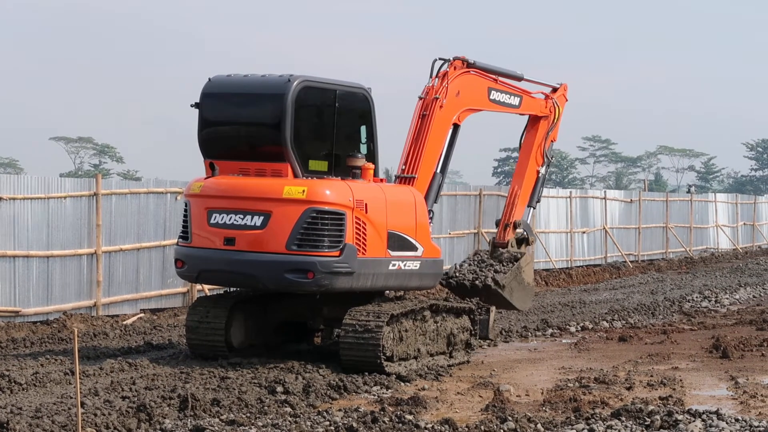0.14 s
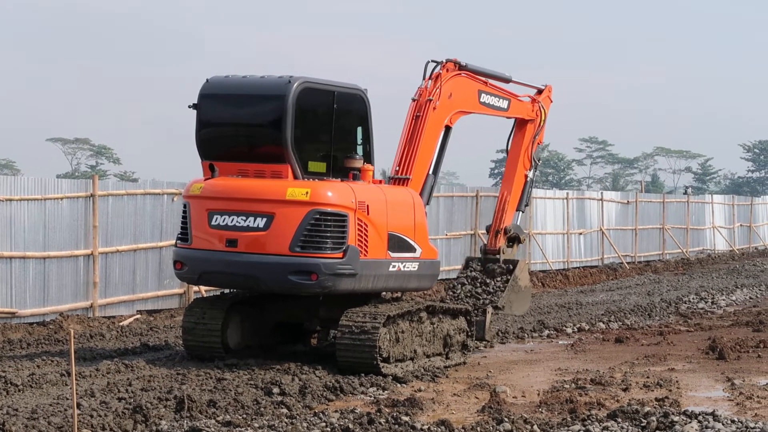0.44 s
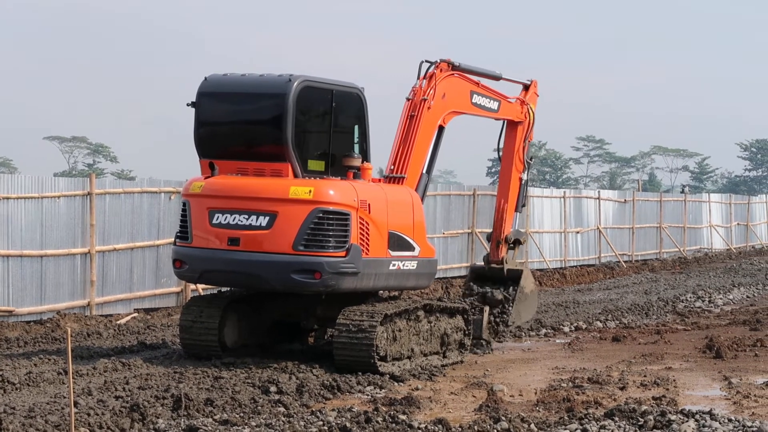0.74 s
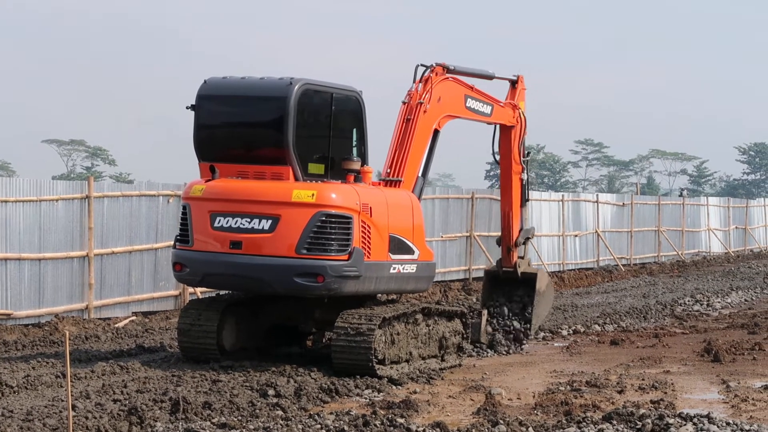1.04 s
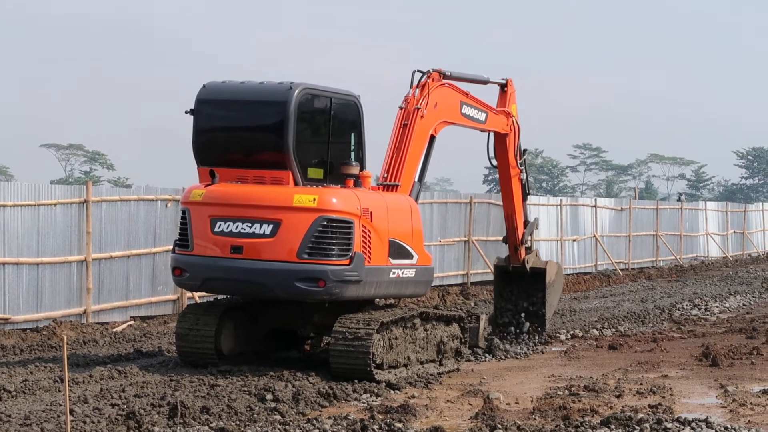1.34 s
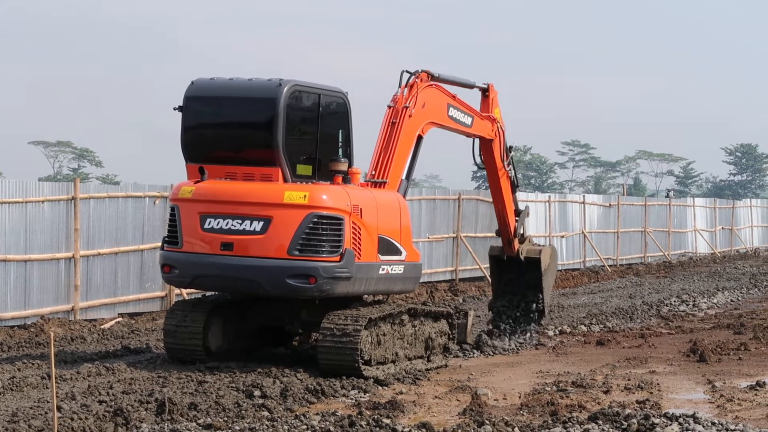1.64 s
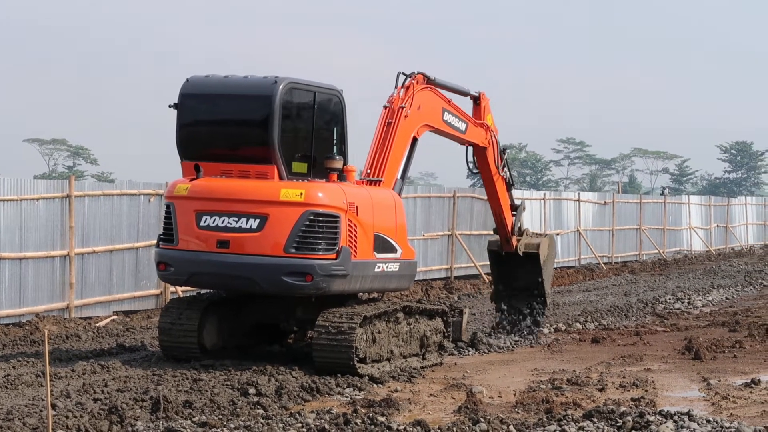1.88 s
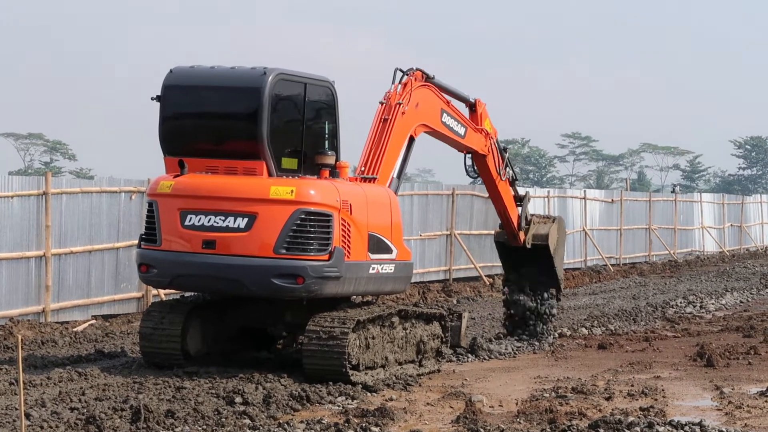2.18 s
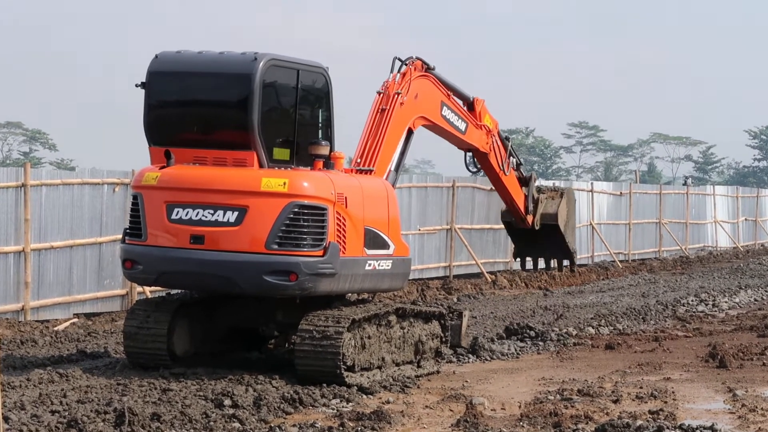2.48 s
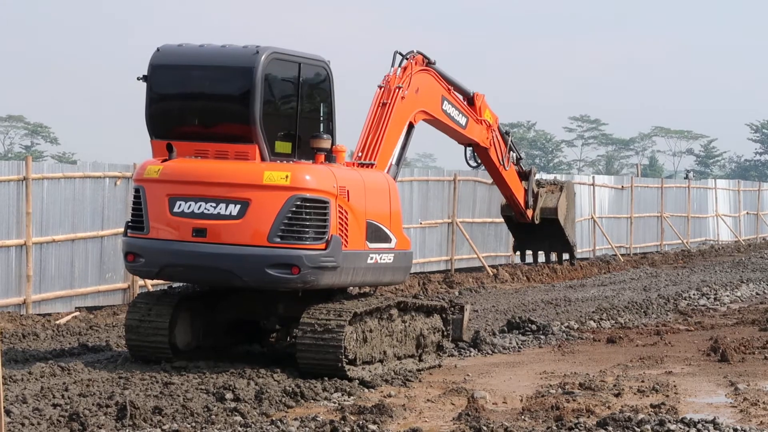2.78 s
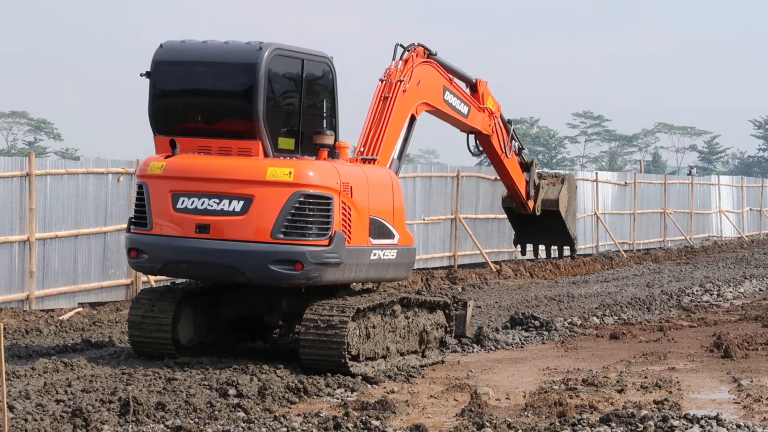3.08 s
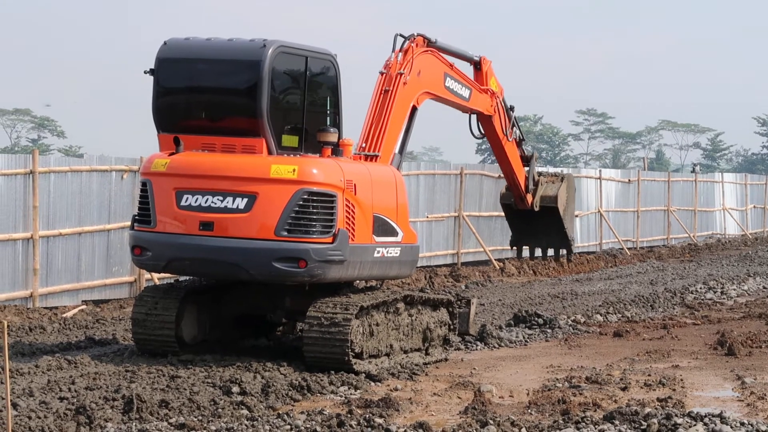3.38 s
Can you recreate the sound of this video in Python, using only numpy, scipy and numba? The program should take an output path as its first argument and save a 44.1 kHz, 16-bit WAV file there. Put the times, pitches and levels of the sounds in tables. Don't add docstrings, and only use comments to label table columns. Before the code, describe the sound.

A diesel excavator drones about ten metres away on an open muddy site, labouring slightly as its arm moves; wet soil trickles and slides from the bucket, stones ticking on steel, heaviest just past two seconds.

```python
import sys
import numpy as np
from scipy import signal
from scipy.fft import rfft, irfft
from scipy.io import wavfile
from scipy.ndimage import uniform_filter1d
from numba import njit

SR = 44100
rng = np.random.default_rng(int(sys.argv[2]) if len(sys.argv) > 2 else 0)


def nominal_scale(level):
    x = np.asarray(level, float) / 20
    return 10 ** x


def inscribe(sig):
    pcm = np.round(np.clip(np.atleast_2d(sig).T, -1, 1) * 32767)
    wavfile.write(sys.argv[1], SR, pcm.astype(np.int16))


N = 155232


def curve(table, column):
    a = np.array(table)
    return np.interp(np.arange(N) / SR, a[:, 0], a[:, column])


def level(x, db):
    return x * nominal_scale(db) / np.sqrt(np.mean(x ** 2))


def colour(x, points, turn=0):
    a = np.array(points)
    hz = np.maximum(np.arange(N // 2 + 1) * SR / N, 1)
    gain_db = np.interp(np.log(hz), np.log(np.maximum(a[:, 0], 1)), a[:, 1])
    return irfft(rfft(x) * nominal_scale(gain_db) * np.exp(1j * turn), N)


def walk(rate):
    hold = int(SR / rate)
    steps = np.repeat(rng.standard_normal(N // hold + 1), hold)
    return 1.23 * uniform_filter1d(uniform_filter1d(steps, hold), hold)[:N]


def ring(x, hz, width):
    return signal.lfilter(*signal.iirpeak(hz, hz / width, fs=SR), x)


@njit
def grains(at, hz, t60, size, n, sr):
    y = np.zeros(n)
    for g in range(len(at)):
        p = np.exp(2j * np.pi * hz[g] / sr - np.log(1000) / (t60[g] * sr))
        z = size[g] + 0j
        for i in range(at[g], min(n, at[g] + int(t60[g] * sr))):
            y[i] += z.imag
            z *= p
    return y


def tone(table, wobble_db, drift, rate):
    turns = np.cumsum(curve(table, 1)) / SR
    size = np.sqrt(2) * nominal_scale(curve(table, 2) + wobble_db * walk(rate))
    return size * np.cos(2 * np.pi * turns + drift * walk(rate))


# start_s, firing_hz, exhaust level_db, load [0-1], oil hiss_db,
# track and frame rumble_db
GOVERNOR = [(0, 74.53, -15, 0.3, 3.5, -0.5), (.15, 74, -16.5, 0.34, 0.5, 1),
            (.3, 73.79, -17.5, 0.5, 1.5, 2), (.5, 74.02, -20.5, 0.12, -0.5, -1.5),
            (.7, 74.2, -19.5, 0.07, 0, -1.5), (.9, 72.2, -14.5, .9, 2, -1.5),
            (1.1, 72.18, -16, 0.85, -2.5, -2.5), (1.4, 72.08, -15, 0.87, -5, -3),
            (1.7, 72.18, -16, 0.96, -2, -3.5), (2.1, 72.4, -17, 0.84, -5, -2),
            (2.5, 72.44, -16.5, 1, -4.5, -3), (2.65, 73.57, -19.5, 0.56, -4.5, -4),
            (2.85, 73.93, -24, 0, -3, -2), (3.05, 74.74, -19.5, 0.15, -1.5, -1.5),
            (3.17, 74.45, -23, 0.34, 0, 0), (3.3, 74.35, -17, 0.38, 2, 1.5),
            (3.52, 73.4, -16.5, 0.7, -0.5, 2.5)]


def governor():
    turns = 0.14 + np.cumsum(curve(GOVERNOR, 1)) / SR
    return turns, np.clip(curve(GOVERNOR, 3), 0, 1)


# multiple of firing rate, light_load_db, full_load_db, wobble_db
EXHAUST = [(1, -0.5, -0.5, 0.7), (2, -18, -6.5, 3.1), (3, -9.5, -3.5, 1.5), (.5, -32, -31, 4),
           (1.5, -12, -17, 4), (2.5, -19, -23, 4), (4, -33, -18.5, -1.5), (8, -23.5, -30, -2.5),
           (9, -13.5, -37, 1.5), (12, -49, -45, 0), (15, -42, -30.5, 0), (17.5, -47, -28.5, -0.5),
           (19, -37, -29, 4), (20, -45, -29.5, -2), (3.5, -46, -23, 7.5)]
STEADIED_BY_LOAD = 0.55


def exhaust(turns, load):
    loose = 1 - STEADIED_BY_LOAD * load
    pulses = 0
    for multiple, light_db, full_db, wobble_db in EXHAUST:
        wobble = loose * wobble_db
        size = nominal_scale(light_db + (full_db - light_db) * load + wobble * walk(9.345))
        pulses = pulses + size * np.cos(2 * np.pi * multiple * turns + 0.19 * wobble * walk(4.98))
    return np.sqrt(2) * nominal_scale(curve(GOVERNOR, 2)) * pulses


# multiple of firing rate, level_db, width_hz, full_load_change_db
WHINES = [
    (2, -23, 1.946, -20),
    (3.53, -26, 5.057, -7.5),
    (5.01, -30.5, 3.99, -10.5),
]


def whines(turns, load):
    total = 0
    for multiple, db, width_hz, load_db in WHINES:
        size = np.sqrt(2) * nominal_scale(db + load_db * load + 2.84 * walk(width_hz * 2))
        total = total + size * np.cos(2 * np.pi * multiple * turns + 0.86 * walk(width_hz))
    return total


# start_s, firing_hz, level_db, brightness_db per multiple
FAR = [(0, 51.97, -24.5, -0.5), (1.4, 52.05, -36, -1), (1.9, 53.2, -29.5, 1.4), (2.4, 53.04, -28.5, 1.27),
       (2.7, 53.17, -23.5, -1.5), (3.0, 53.3, -22.5, -1.16), (3.52, 53.05, -26, 0.7)]
# multiple of firing rate, level_db
FAR_STACK = [(1, -5.5), (2, 0.5), (3, -13.5), (4, -25.5), (5, -5.5), (6, -9.5)]
# start_s, level_db
FAR_BOOM = [(0, -3), (1.4, -4), (1.9, 0), (2.8, -6), (2.95, 6), (3.2, 4), (3.52, -1)]


def far_machine():
    turns = np.cumsum(curve(FAR, 1)) / SR
    drone = 0
    for multiple, db in FAR_STACK:
        partial_db = db + (multiple - 1) * curve(FAR, 3) + 0.97 * walk(5.07)
        if multiple == 1:
            partial_db = partial_db + curve(FAR_BOOM, 1)
        drone = drone + nominal_scale(partial_db) * np.cos(2 * np.pi * multiple * turns + 1.04 * walk(3.07))
    return np.sqrt(2) * nominal_scale(curve(FAR, 2)) * drone


# pitch_hz, width_hz, level_db, share of the oil hiss swing
HOOD = [(573.3, 41, -9.5, 0.31), (636.6, 38, -2, 0.47), (719.4, 79, 1.5, 1.16), (851, 52, -4, 0.54),
        (900, 21.4, -3.5, 0.94), (1131, 76, -3, 1.35), (1269.5, 48, -4, 0.1), (1394, 66, -4.5, 0.36),
        (1812, 210, -1.5, 0.91), (1977, 126, -5.5, 0.93), (2280, 108, -10.5, 0.64), (2800, 123, -9.5, 0.76),
        (3016, 104, -9, 1.13), (3804, 83, -18.5, 0.24)]
CYLINDERS_DB = np.array([-7.0, -12, -7.5, -6])
# pitch_hz, level_db per Hz
AIR = [(260, -42), (450, -14), (869, -5), (1020, -15.5), (1390, -12), (1560, -18), (3060, -21),
       (8650, -46.5), (14900, -80)]
# pitch_hz, level_db per Hz
RUMBLE = [(24, -15), (36, -10), (50, -5), (95, 0), (135, -3.5), (200, -5.5), (330, -11), (480, -20)]
HOOD_DB, AIR_DB, RUMBLE_DB, TICK_DB = -30.5, -32, -23, -5.5
KNOCK_SHARE, KNOCK_TURNS = 0.15, 1
AIR_FOLLOWS = 0.5
PANEL_SWAY_DB = 0.7


def hood(turns):
    effort = curve(GOVERNOR, 4)
    firing = turns.astype(int)
    size = nominal_scale(3.2 * rng.standard_normal(400))[firing]
    gate = 1 + KNOCK_SHARE * 3 * size * np.exp(-(turns % 1) / KNOCK_TURNS)
    cylinder = nominal_scale(CYLINDERS_DB[firing % len(CYLINDERS_DB)])
    ticks = np.diff(firing, prepend=0) * np.sqrt(size) * cylinder
    drive = level(gate * rng.standard_normal(N), 0) + level(ticks, TICK_DB)
    panels = 0
    for hz, width, db, share in HOOD:
        mode = ring(ring(drive, hz, 1.42 * width), hz, 1.42 * width)
        panels = panels + nominal_scale(db + share * effort + PANEL_SWAY_DB * walk(5.85)) * level(mode, 0)
    air = colour(gate * nominal_scale(walk(24.95)) * rng.standard_normal(N), AIR)
    rumble = colour(rng.standard_normal(N), RUMBLE + [(700, -60)])
    rumble = nominal_scale(curve(GOVERNOR, 5) + 1.2 * walk(10)) * rumble
    air = nominal_scale(AIR_FOLLOWS * effort) * level(air, AIR_DB)
    return level(panels, HOOD_DB) + air + level(rumble, RUMBLE_DB)


# start_s, pitch_hz, level_db
VALVE = [(0, 871.5, -38.5), (1.05, 866, -45), (1.6, 866, -41), (2.14, 870, -40), (2.6, 864.4, -41.5),
         (2.8, 868, -35.5), (3.25, 858, -36), (3.52, 870, -36.5)]


def relief_valve():
    return tone(VALVE, wobble_db=2.5, drift=2.2, rate=40)


# start_s, pitch_hz, level_db
GROAN = [
    (0, 156, -28),
    (.2, 141, -24.5),
    (.5, 141, -32),
    (.75, 148, -36),
    (.95, 146, -63),
    (3.52, 146, -60),
]


def track_groan():
    return tone(GROAN, wobble_db=1.0, drift=0.65, rate=8.1)


# peak_s, level_db, rise_s, fall_s
SLIDES = [(.905, -34.5, 0.043, 0.018), (1.079, -29.5, 0.018, 0.024), (1.17, -42, 0.039, 0.046),
          (1.3, -42, 0.057, 0.088), (1.5, -54, 0.033, 0.02), (1.72, -38, 0.085, 0.016),
          (1.9, -38, .05, 0.055), (2.03, -36, 0.047, .03), (2.24, -48, 0.044, 0.011),
          (2.329, -27, 0.03, 0.028), (2.355, -29, 0.013, 0.028), (2.395, -28.5, 0.0049, 0.019),
          (2.44, -34, .02, 0.043), (2.51, -38.5, 0.039, 0.036), (2.7, -37.5, 0.01, 0.027),
          (2.79, -40, .008, 0.0093), (3.21, -39, 0.018, 0.022)]
# pitch_hz, level_db per Hz
SOIL = [(700, -31), (1100, 0), (2000, -4), (3700, -6.5), (5500, -18.5), (8000, -27.5), (12000, -43),
        (15000, -59)]
# pitch_hz, level_db per Hz
MUD = [(700, -26), (1300, -2.5), (2600, 3), (3900, 1.5), (5500, -8.5), (7500, -13), (10000, -21.5),
       (14000, -31)]
# start_s, level_db
TRICKLE = [(0, -51), (.7, -49.5), (.9, -47), (1.4, -46.5), (1.8, -49), (2.2, -45), (2.55, -55), (2.65, -53),
           (2.8, -57), (2.9, -59), (3.1, -48.5), (3.52, -51)]
# pitch_hz, level_db per Hz
CRUMBS = [(700, -40), (2000, -14.5), (4000, -5.5), (7000, -12), (10000, -24), (13000, -26.5), (15000, -43)]
GRAINS_PER_S, GRAIN_SPREAD_DB, GRAIN_CYCLES = 12000, 2.2, 20
WASH_SHARE = 0.45


def soil():
    t = np.arange(N) / SR
    flow = 0
    for peak_s, db, rise_s, fall_s in SLIDES:
        flow = flow + nominal_scale(db) * np.exp(np.where(t < peak_s, (t - peak_s) / rise_s, (peak_s - t) / fall_s))
    chance = rng.random((46000, 4))
    gaps_s = -np.log(1 - chance[:, 0]) / GRAINS_PER_S
    at = np.cumsum(gaps_s * SR).astype(np.int64)
    hz = 900 * 17 ** (chance[:, 1] ** 0.7)
    size = nominal_scale(-GRAIN_SPREAD_DB * np.log(1 - 0.998 * chance[:, 2])) * (hz / 4000) ** 1.5
    t60 = GRAIN_CYCLES * (0.5 + chance[:, 3]) / hz
    bits = grains(at, hz, t60, size, N, 1. * SR)
    slide = np.sqrt(1 - WASH_SHARE) * level(colour(bits, SOIL), 0)
    wash = np.sqrt(WASH_SHARE) * level(colour(rng.standard_normal(N), MUD), 0)
    crumbs = level(colour(rng.standard_normal(N), CRUMBS), 0)
    crumbs = nominal_scale(curve(TRICKLE, 1) + 2.0 * walk(29.2)) * crumbs
    return flow * nominal_scale(2.36 * walk(150)) * (slide + wash) + crumbs


# start_s, peak level_db, pitch_hz, t60_s
STONES = [(.582, -43, 3100, 0.021), (.93, -48, 8060, 0.02), (.895, -36, 3000, .01), (1.343, -38, 2840, .01),
          (1.548, -46, 3060, .01), (1.642, -41, 3060, .01), (1.682, -43, 2750, .01),
          (1.986, -46, 2540, .01), (2.021, -38, 3048, .01), (2.045, -41, 2800, 0.012),
          (2.209, -35, 3701, 0.011), (2.256, -42, 2840, .01), (2.296, -40, 2933, .01),
          (2.309, -34, 3952, .01), (2.421, -36, 4000, 0.0072), (3.215, -37, 3756, 0.017),
          (3.24, -39, 5500, .01), (1.127, -35, 3650, 0.007), (1.170, -39, 7280, 0.009),
          (1.171, -37, 9900, .006), (1.170, -40, 12200, .004), (1.355, -48, 11900, .01),
          (1.454, -44, 7900, .015), (1.500, -41, 7900, 0.025), (1.500, -30, 3560, 0.01),
          (1.501, -64, 12800, .03), (1.714, -27.5, 2430, 0.018), (2.013, -34.5, 2770, 0.037),
          (1.070, -40, 3623, 0.008), (1.077, -34, 3000, .008), (1.085, -34, 3300, .008),
          (2.372, -29, 2700, 0.009), (1.083, -36.5, 7000, 0.011), (2.346, -28.5, 1280, 0.081),
          (2.358, -26, 3840, 0.025), (2.394, -24, 7330, 0.0044), (2.394, -42, 10500, 0.0027),
          (2.394, -28, 6300, .004), (2.395, -33, 3860, 0.04), (2.575, -35.5, 3700, 0.013),
          (2.698, -35, 3430, 0.014), (2.787, -36.5, 3740, .012)]
CRACK_DB, CRACK_S = -13, 0.0004
STONE_TOP_HZ = 9500


def stones():
    a = np.array(STONES, float)
    at = (a[:, 0] * SR).astype(np.int64)
    rings = np.zeros(N)
    for ratio, db in ((1, 7), (1.07, -5)):
        rings = rings + grains(at, a[:, 2] * ratio, a[:, 3], nominal_scale(a[:, 1] + db), N, 1. * SR)
    hits = np.zeros(N)
    np.add.at(hits, at, nominal_scale(a[:, 1] + CRACK_DB))
    decay = np.exp(-1 / (CRACK_S * SR))
    crack = signal.lfilter([1], [1, -decay], hits) * rng.standard_normal(N)
    return signal.lfilter(*signal.butter(2, STONE_TOP_HZ, fs=SR), rings + ring(crack, 6000, 8000))


# pitch_hz, side level relative to mid_db
PORTS = [(60, -43), (110, -29), (200, -27.5), (370, -19), (690, -26), (1260, -15.5), (2320, -13),
         (4260, -9), (7840, -1.5), (14400, 1.5)]
SCATTER_S = 0.02


def scene():
    turns, load = governor()
    engine = exhaust(turns, load) + whines(turns, load) + hood(turns)
    mid = engine + far_machine() + relief_valve() + track_groan() + soil() + stones()
    lag_s = SCATTER_S * walk(1200)[:N // 2 + 1]
    side = colour(mid, PORTS, np.pi / 2 - 2 * np.pi * np.cumsum(lag_s) * SR / N)
    return np.array([mid + side, mid - side])


def band_limit(x):
    return signal.sosfilt(signal.butter(12, 15120, fs=SR, output="sos"), x)


def record(dry):
    ceiling, top_hz = 1.1, 14300
    soft = ceiling * np.tanh(dry / ceiling)
    mix = signal.sosfilt(signal.butter(4, top_hz, fs=SR, output="sos"), soft)
    return band_limit(mix)


dry = scene()
out = record(dry)
inscribe(out)
```